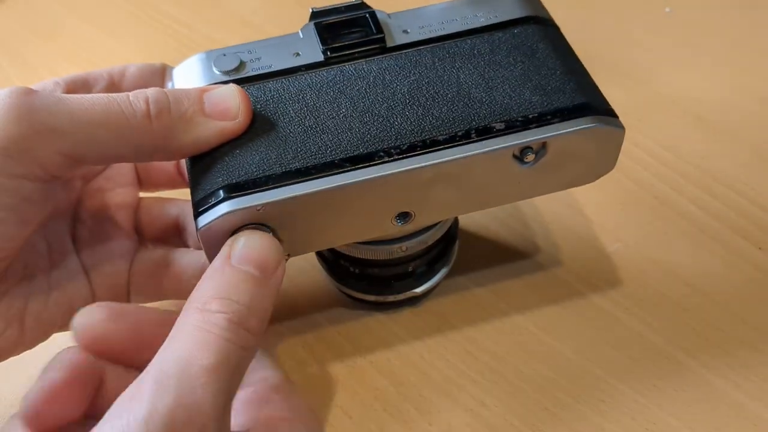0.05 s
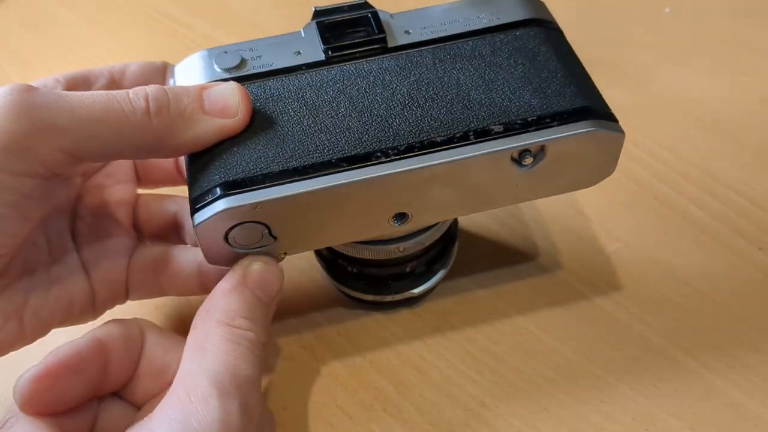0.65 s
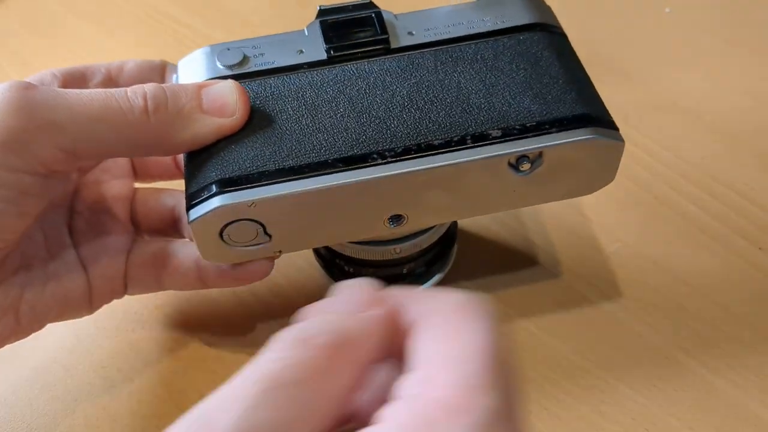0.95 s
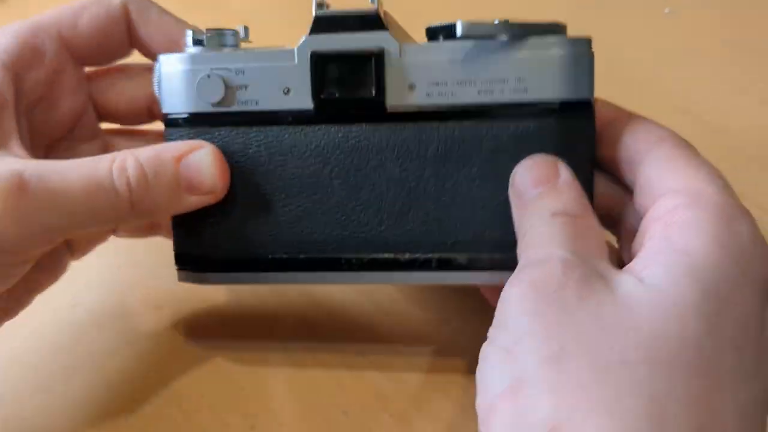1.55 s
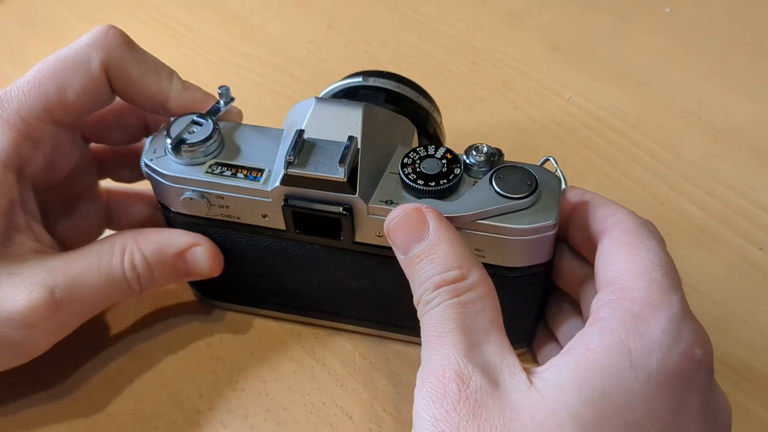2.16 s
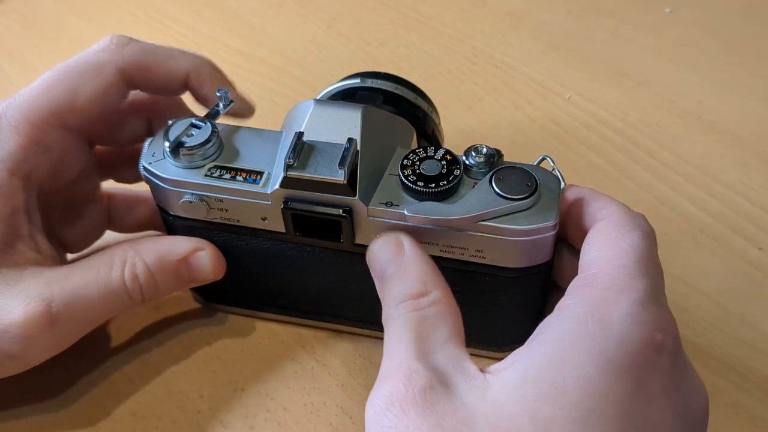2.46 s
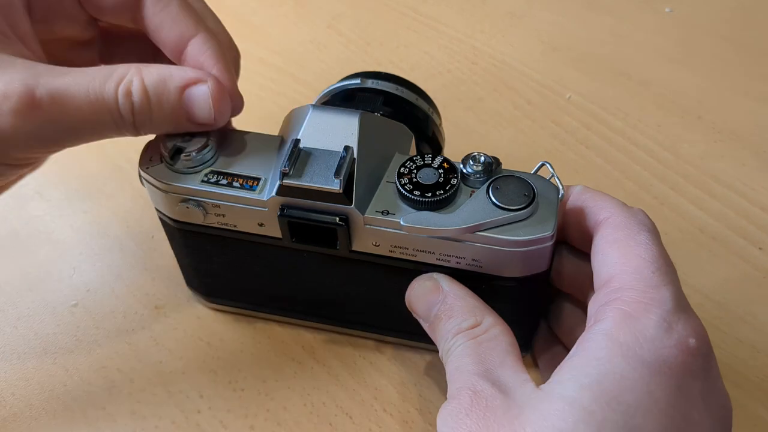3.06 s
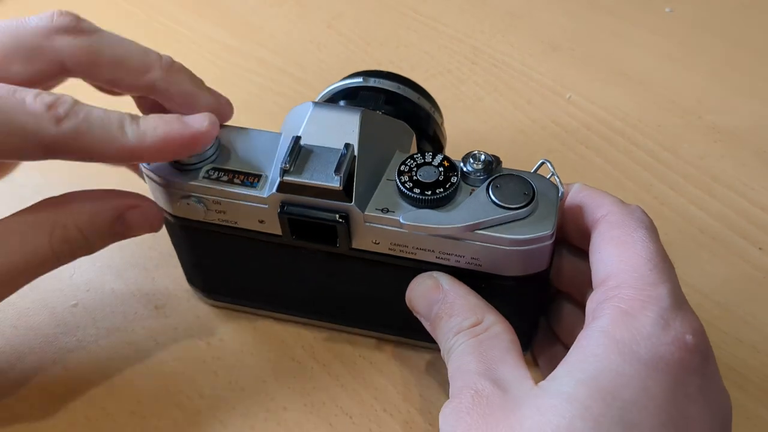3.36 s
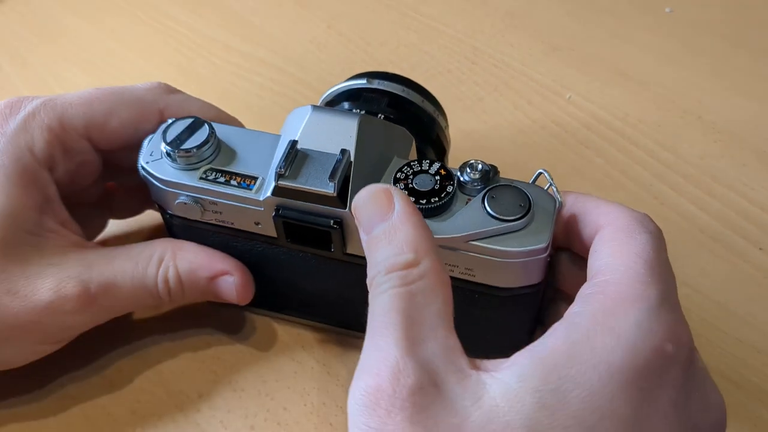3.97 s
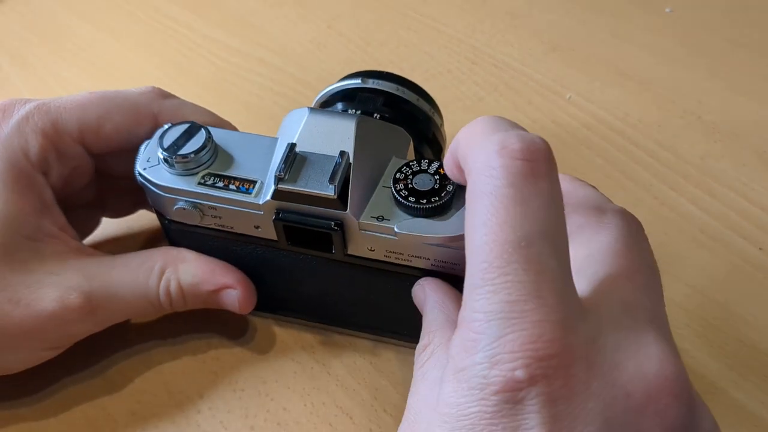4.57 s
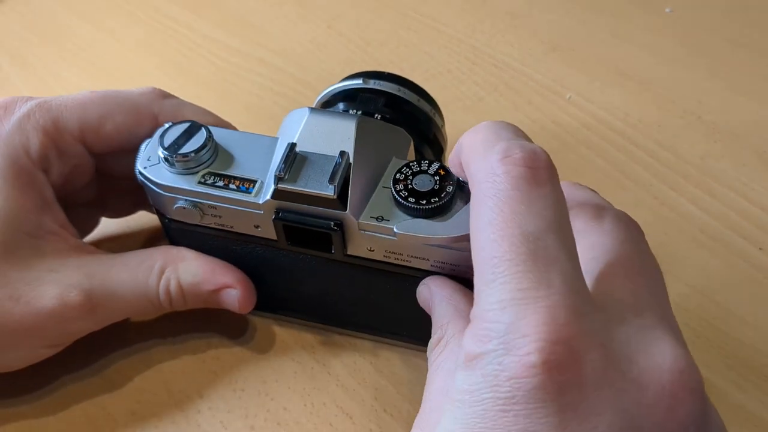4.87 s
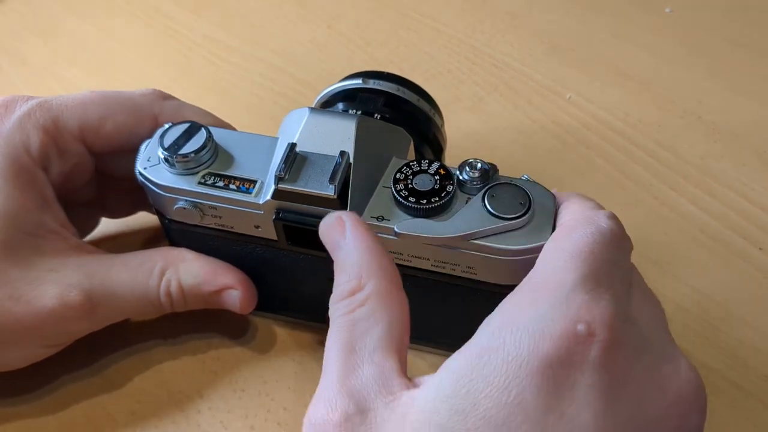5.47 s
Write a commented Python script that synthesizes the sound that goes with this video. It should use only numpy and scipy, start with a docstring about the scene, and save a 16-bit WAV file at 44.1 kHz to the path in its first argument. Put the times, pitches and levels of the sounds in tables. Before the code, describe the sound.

In a small, echoing room, a button on a metal film camera snaps out sharply. The lens rim skids briefly on a wooden table and the body is set down with several hollow knocks. Fingers slide faintly and fittings tick. The rewind crank folds shut with a bright click, and near the end the shutter fires with a quick whirr and clack. The sound is close, over a faint fan-like hum.

```python
"""A metal film camera is handled on a wooden table, then its shutter fires: the release snaps, gears whirr,
the curtains chatter against their stop and the mirror bounces. Before that a base button snaps, the lens
rim skids in stick-slip, the body is set down, ringing table and barrel, and the rewind crank folds shut.
Fittings tick and fingers slide in between. A faint fan-like hum fills the small, echoing room."""
import sys
import numpy as np
from scipy import signal
from scipy.fft import rfft, irfft, next_fast_len
from scipy.io import wavfile
from scipy.ndimage import uniform_filter1d

SR = 44100
rng = np.random.default_rng(int(sys.argv[2]) if len(sys.argv) > 2 else 0)


def output_pcm(signal):
    """Save a mono or channel-first signal as 16-bit PCM at the path in sys.argv[1].

    Samples are clipped to [-1, 1] before scaling.
    """
    pcm = np.clip(np.atleast_2d(signal).T, -1, 1) * 32767
    wavfile.write(sys.argv[1], SR, np.round(pcm).astype(np.int16))


N = 243431


def amp(db):
    """dB to gain."""
    return 10 ** (np.asarray(db) / 20)


def unit(x):
    """x at rms 1."""
    return x / np.sqrt(np.mean(x ** 2) + 1e-20)


def unit_hit(x):
    """x at the energy of 3 ms at rms 1, per channel."""
    return x / np.sqrt(np.sum(x ** 2, axis=-1, keepdims=True) / (.003 * SR) + 1e-20)


def along(points, hz):
    """(f/Hz, value) points read on a log axis."""
    f, v = np.transpose(points)
    return np.interp(np.log(hz + 1), np.log(f + 1), v)


def clock(size):
    """Sample times in s."""
    return np.arange(size) / SR


def swell(start_s, attack_s, hold_s, fall_db_per_s):
    """Envelope: rise, hold, decay."""
    t = clock(N) - start_s
    return np.clip(t / attack_s, 0, 1) ** 2 * amp(-fall_db_per_s * np.maximum(t - attack_s - hold_s, 0))


def add(track, s, x):
    """Mix x into track at time s."""
    part = track[:, round(s * SR):][:, :x.shape[-1]]
    part += x[..., :part.shape[1]]


def panned(x, left_db):
    """Left channel left_db above the right."""
    return x * amp([[left_db / 2], [-left_db / 2]])


def filtered(x, response):
    """x through a complex frequency response."""
    n = x.shape[-1]
    m = 2 * next_fast_len(n)
    return irfft(rfft(x, m) * response(np.fft.rfftfreq(m, 1 / SR)), m)[..., :n]


def coloured(x, tone):
    """Minimum-phase filter through (f/Hz, gain/dB) points."""
    def response(hz):
        cepstrum = irfft(np.log(amp(along(tone, hz))))
        cepstrum[1:len(hz) - 1] *= 2
        cepstrum[len(hz):] = 0
        return np.exp(rfft(cepstrum))
    return filtered(x, response)


def resonate(x, modes):
    """x through parallel (f/Hz, width/Hz, gain/dB) resonators."""
    def response(f):
        return sum(amp(db) * 1j * f * width / (hz * hz - f * f + 1j * f * width)
                   for hz, width, db in modes)
    return filtered(x, response)


def ringing(modes, rise_s, size=16384):
    """Damped (f/Hz, level/dB, t60/s) sines, random phases."""
    t = clock(size)
    hz, db, t60 = np.transpose(modes)[..., None]
    phase = rng.uniform(0, 2 * np.pi, hz.shape)
    partials = amp(db - 60 * t / t60) * np.sin(2 * np.pi * hz * t + phase)
    return partials.sum(axis=0) * (1 - np.exp(-t / rise_s))


# f/Hz, left-right correlation
CORRELATION = [(100, 0.85), (300, 0.92), (600, 0.36), (1200, -0.23), (2500, -0.1), (8000, -0.1)]


def noise(size):
    """Stereo white noise: alike in the bass, nearly unrelated in the treble."""
    def mid_side_gains(hz):
        angle = np.arccos(np.clip(along(CORRELATION, hz), -1, 1)) / 2
        return np.array([np.cos(angle), np.sin(angle)])
    mid, side = filtered(rng.standard_normal((2, size)), mid_side_gains)
    return np.array([mid + side, mid - side])


def snap(tone, t60_s, rise_s, size=4096):
    """Brief chatter of metal parts: a coloured noise burst."""
    t = clock(size)
    burst = noise(size) * amp(-60 * t / t60_s) * (1 - np.exp(-t / rise_s)) ** 2
    return unit_hit(coloured(burst, tone))


# Air spectrum: f/Hz, level/dB
AIR_TONE = [(15, -49), (25, -16.5), (43, -3), (114, -8), (145, 0), (170, -6.5), (200, 1), (363, -8),
            (416, -7.5), (695, -12), (911, -21), (1940, -14), (2350, -22.5), (4140, -28.5), (16000, -80.5)]
# Fan resonances: f/Hz, width/Hz, level/dB
FAN_MODES = [(197.1, 11, -3.5), (280.3, 5.4, -1.5), (424.9, 7, -3), (520.5, 40, -8), (1957.5, 62, -9.5)]


def background():
    """Steady room air and the resonant hum of a fan."""
    air = amp(-59.5) * unit(coloured(noise(N), AIR_TONE))
    fan = amp(-61.5) * unit(resonate(noise(N), FAN_MODES))
    return air + fan


# Room decay: f/Hz, t60/s
ECHO_DECAY = [(100, 1.17), (260, 0.35), (700, 0.65), (1840, 0.93), (3000, 0.41), (4850, 0.42),
              (12800, 0.14)]
# Echo spectrum: f/Hz, level/dB
ECHO_TONE = [(80, -1.5), (300, 0), (800, -7.5), (2800, -5.5), (6000, -10.5), (14000, -6.5)]


def room(x):
    """Diffuse stereo echo of the left channel; treble dies first."""
    hz, t, spectrum = signal.stft(noise(size=32768), SR, nperseg=256)
    t60 = along(ECHO_DECAY, hz)[:, None]
    fade = amp(along(ECHO_TONE, hz)[:, None] - 60 * t / t60)
    fade *= np.sqrt(2 * np.log(1000) / (t60 * SR))  # energy independent of t60
    tail = signal.istft(spectrum * fade, SR, nperseg=256)[1]
    tail *= np.clip(clock(tail.shape[1]) / .0058, 0, 1) ** 2  # walls answer late
    return signal.fftconvolve(x[:1], tail, axes=1)[:, :N]


# Shading of the right side: f/Hz, left over right/dB
LEFT_EXCESS = [(700, 0), (1800, 1.5), (4500, 5), (8000, 9), (13000, 4.5)]


def direct_path(x, right_lag_s=.00013):
    """The camera's sound reaches the left sooner and brighter."""
    side = np.array([[.5], [-.5]])
    def response(hz):
        return amp(side * along(LEFT_EXCESS, hz)) * np.exp(2j * np.pi * hz * side * right_lag_s)
    return filtered(x, response)


def shudder():
    """The shifting body judders at the table's lowest resonance."""
    envelope = swell(start_s=2.945, attack_s=.027, hold_s=.014, fall_db_per_s=110)
    return amp(-51) * envelope * unit(np.sin(2 * np.pi * 75 * clock(N)))


# Rub spectrum: f/Hz, level/dB
RUB_TONE = [(60, -11), (150, 2.5), (280, -0.5), (480, 0.5), (700, -5.5), (1000, -12.5), (1700, -11),
            (3000, -40), (8000, -51)]


def drag():
    """The body shifts on the table: a short, cushioned rub."""
    envelope = swell(start_s=.431, attack_s=.0089, hold_s=.014, fall_db_per_s=300)
    return amp(-46) * envelope * unit(coloured(noise(N), RUB_TONE))


# Fitting and case spectra: f/Hz, level/dB
FITTING_TONE = [(2000, -39.5), (5000, -14), (6500, -2.5), (8000, -11), (10000, 0), (12400, 1.5),
                (14000, -9), (16000, -1)]
CASE_KNOCK_TONE = [(400, -14), (1100, 0.5), (2800, -4.5), (3500, -4.5), (4400, -4.5), (5200, -14.5),
                   (6400, -6.5), (9000, -22), (16000, -30.5)]


def tick(case_db):
    """A fitting's bright tick and its knock through the case."""
    fitting = snap(FITTING_TONE, t60_s=.017, rise_s=.00037)
    return fitting + amp(case_db) * snap(CASE_KNOCK_TONE, t60_s=.017, rise_s=.0005)


# Finger slides: centre t/s, half length/s, level/dB
FINGER_SLIDES = [(0.722, 0.033, -67.5), (1.621, 0.011, -64), (2.682, 0.015, -57.5), (2.792, 0.013, -65),
                 (3.395, .008, -67), (3.57, 0.016, -60.5), (3.757, 0.012, -67), (3.983, 0.016, -74),
                 (4.311, 0.019, -73.5), (5.109, 0.0047, -60), (5.268, 0.024, -62)]


def fingers(snags_per_s=70, snag_db=6):
    """Skin slides over the fittings: grainy hiss, random snags."""
    pressure = sum(amp(db) * np.exp(-((clock(N) - s) / half_s) ** 2) for s, half_s, db in FINGER_SLIDES)
    grain = amp(3.5 * unit(uniform_filter1d(rng.standard_normal(N), size=90)))
    hiss = pressure * unit(coloured(noise(N) * grain, FITTING_TONE))
    snags = pressure * (rng.random(N) < snags_per_s / SR)
    return hiss + amp(snag_db) * signal.fftconvolve(snags[None], tick(case_db=-10.5), axes=1)[:, :N]


# Ticks: t/s, level/dB, case re tick/dB
FITTING_TICKS = [(1.5767, -60.5, 8.5), (1.6404, -46.5, 1), (2.6009, -60, 4.5), (2.681, -44.5, -25),
                 (2.698, -46.5, -26), (2.815, -55, -27), (3.4074, -56.5, -8), (3.5604, -45, -16),
                 (3.6802, -46.5, -13), (3.6894, -38, -18), (3.721, -44.5, -22), (3.8362, -61, 0),
                 (4.008, -59, -0.5), (4.533, -68, 4), (4.6291, -55.5, 7), (5.1155, -45, 0),
                 (5.2573, -51, -16), (5.4493, -59, -10)]


def fittings():
    """Strap rings, dials and levers tick as the hands move."""
    out = np.zeros((2, N))
    for s, db, case_db in FITTING_TICKS:
        add(out, s, amp(db) * tick(case_db))
    return out


# Wood thud spectrum: f/Hz, level/dB
THUD_TONE = [(30, -39.5), (70, -4.5), (140, -4.5), (300, -5.5), (480, -2.5), (900, -7), (1500, -8),
             (3000, -8.5), (8000, -25)]
# Table top and hollow lens barrel: f/Hz, width/Hz, level/dB
TABLE_MODES = [(74.5, 4.6, -4), (160, 32, -2.5), (227.4, 25, -18), (286, 51, -1.5), (370, 30, -4),
               (400.5, 31, 3), (565, 27, 2), (650, 33, -12), (800, 11, -12.5), (1206, 13, 5),
               (1333, 40, -25.5)]
BARREL_MODES = [(776, 48, -0.5), (836, 16, 1), (968, 85, -7.5), (1210, 21, -19), (1384, 6.1, -4.5),
                (1784, 57, -7), (2070, 15, -2), (2430, 14, -5)]


def bump(contact_hz, barrel_db):
    """One push rings table and barrel; softer contacts are duller and move the table more."""
    u = 2 * np.pi * 2.23 * contact_hz * clock(size=16384)
    push = -u ** 2 * np.exp(-u)
    thud = amp(-9.5) * unit_hit(coloured(push, THUD_TONE))
    rocking = amp(-9.5) * unit_hit(resonate(push, [(contact_hz, contact_hz / 5, 0)]))
    table_db = -8 - 2.5 * np.log2(contact_hz / 200)
    table = amp(table_db) * unit_hit(resonate(push, TABLE_MODES))
    barrel = amp(barrel_db + 5.5) * unit_hit(resonate(np.diff(push, prepend=0), BARREL_MODES))
    return thud + rocking + table + barrel


# Skidding lens on the table: f/Hz, width/Hz, level/dB
SKID_MODES = [(157, 27, -4), (311, 89, -7), (580, 45, -2), (796, 130, -6), (1222, 16, -2.5), (1412, 11, -3),
              (1807, 28, -5.5), (2094, 7.2, -1.5), (2500, 52, -10), (3410, 42, -15), (3850, 84, -2),
              (4400, 140, -41), (6630, 99, -3), (7810, 35, -32)]
SKID_S, GRIP_S, PUSH_S = 1.3793, .016, .046  # start, then two durations
SLIP_HZ, SLIP_TOP_HZ, SLIP_OCTAVES_PER_S = 230, 2200, 47


def skid(growth_db_per_s=170):
    """The rim sticks and slips on the wood; quicker slips reach higher resonances."""
    gripped_s = SKID_S + GRIP_S
    def cutoff_hz(s):
        octaves = np.clip(SLIP_OCTAVES_PER_S * (s - gripped_s), 0, np.log2(SLIP_TOP_HZ / SLIP_HZ))
        return SLIP_HZ * 2 ** octaves
    force = amp(-24.5 + growth_db_per_s * np.minimum(clock(N) - gripped_s - PUSH_S, 0))
    force *= swell(SKID_S, GRIP_S, PUSH_S, fall_db_per_s=275)
    hz, t, spectrum = signal.stft(noise(N), SR, nperseg=256)
    spectrum /= np.sqrt(1 + (hz[:, None] / cutoff_hz(t)) ** 3)
    slips = signal.istft(spectrum, SR, nperseg=256)[1][:, :N]
    slips *= force / np.sqrt(cutoff_hz(clock(N)) / (SR / 2))  # power independent of cutoff
    bass_cut = signal.butter(2, 100, "highpass", fs=SR, output="sos")  # too small to radiate bass
    slips = signal.sosfilt(bass_cut, slips)
    return amp(-11.5) * slips + amp(5) * resonate(slips, SKID_MODES)


# Lens rim: f/Hz, level/dB, t60/s
RIM_MODES = [(3720, -2.5, 0.21), (3970, -7, 0.21), (6600, -14, 0.17), (6870, -13, 0.17), (12400, 1, 0.079)]
# Catches on the wood: t/s, level/dB
RIM_CATCHES = [(1.433, -42.5), (1.4408, -42), (1.4549, -36)]


def rim():
    """The body tips onto the lens; the thin rim ticks and sings where it catches."""
    out = np.zeros((2, N))
    add(out, SKID_S - .022, amp(-41.5) * bump(contact_hz=129, barrel_db=-26.5))
    for s, db in RIM_CATCHES:
        add(out, s, amp(db) * tick(case_db=1.5))
        ring = np.array([ringing(RIM_MODES, rise_s=.00071), ringing(RIM_MODES, rise_s=.0014)])
        add(out, s, amp(db - 7) * ring)
    return out


# Body on table: t/s, level/dB, contact f/Hz, relative barrel level/dB, relative rattle level/dB
BODY_KNOCKS = [(1.633, -34, 400, -8.5, -17.5), (1.712, -19, 254, -11, -30),
               (1.8372, -16.5, 334, -32.5, -25.5), (2.128, -27, 355, -15.5, -33.5),
               (2.179, -33, 302, -28, -28), (3.193, -40, 173, -24, -39), (3.7947, -31, 319, -31, -41),
               (4.478, -49.5, 130, -26.5, -15)]
# Loose parts: f/Hz, level/dB
LOOSE_TONE = [(400, -17), (1200, -0.5), (3300, -4.5), (5000, -15.5), (16000, -35)]


def knocks(reflection_s=.0152, reflection_db=-4.5, reflection_pitch=.666):
    """The body knocks, its case clicks, parts rattle; a softer, duller early room reflection follows."""
    out = np.zeros((2, N))
    for s, db, contact_hz, barrel_db, rattle_db in BODY_KNOCKS:
        add(out, s, amp(db) * bump(contact_hz, barrel_db))
        add(out, s, amp(db + rattle_db) * tick(case_db=3))
        add(out, s, amp(db + rattle_db + 4) * snap(LOOSE_TONE, t60_s=.13, rise_s=.002))
        reflection = bump(reflection_pitch * contact_hz, barrel_db - 7.5)
        add(out, s + reflection_s, amp(db + reflection_db) * reflection)
    return out


# Button snaps: t/s, level/dB
BUTTON_SNAPS = [(0.2116, -15.5)]
# Snap spectrum: f/Hz, level/dB
BUTTON_SNAP_TONE = [(300, -38.5), (1600, -25.5), (2150, -6.5), (3300, -15), (4200, -4), (5200, -15),
                    (6200, 0.5), (7500, -11.5), (8400, -7), (9200, -1.5), (10000, -5), (10800, 4.5),
                    (12200, -6.5), (13500, -7), (16000, -11.5)]
# Base plate: f/Hz, level/dB, t60/s
PLATE_MODES = [(2580, -2.5, .025), (2764, -1.5, .025), (2930, 0, 0.045), (3010, -10, 0.032),
               (3250, -11, .025)]


def button():
    """The base button springs out; the plate rings, mostly on the right."""
    out = np.zeros((2, N))
    for s, db in BUTTON_SNAPS:
        ring = unit_hit(ringing(PLATE_MODES, rise_s=.0011))
        ping = unit_hit(ringing([(2730, 0, .0034)], rise_s=.00046))
        plate = amp(db - 12) * ring + amp(db - 14) * ping
        add(out, s, amp(db - 9) * snap(BUTTON_SNAP_TONE, t60_s=.013, rise_s=.0003))
        add(out, s + .0012, panned(plate, left_db=-6.5))
    return out


# Crank folds: t/s, level/dB
CRANK_FOLDS = [(3.264, -17.5)]
# Fold spectrum: f/Hz, level/dB
FOLD_TONE = [(400, -18), (2000, -13), (3200, -22.5), (5200, -17.5), (6300, 3.5), (7400, -14.5), (8400, -11),
             (9400, -1.5), (11000, -11), (11900, 2), (13500, -4.5), (16000, -3)]


def crank():
    """The rewind crank snaps into its knob, rebounds once and nudges the body."""
    out = np.zeros((2, N))
    for s, db in CRANK_FOLDS:
        add(out, s, amp(db - 6) * snap(FOLD_TONE, t60_s=.0096, rise_s=.00058))
        add(out, s + .0048, amp(db - 13) * snap(FOLD_TONE, t60_s=.018, rise_s=.00047))
        add(out, s, amp(db - 21.5) * bump(contact_hz=197, barrel_db=-22))
    return out


# Gear train: f/Hz, level/dB
WHIRR_TONE = [(60, -31.5), (140, -8), (400, 1.5), (660, -13), (950, 5.5), (1300, -16), (2100, -11),
              (2800, -5), (3500, -9), (4100, -2.5), (5200, -11.5), (6500, -4.5), (7900, -15), (11000, -7.5),
              (15500, -16)]
RELEASE_S, CURTAIN_START_S, CURTAIN_STOP_S = 4.8419, .033, .078  # curtain times after release


def gears():
    """Gears idle from the release, spin up with the curtains, then run out."""
    idle = amp(-42) * swell(RELEASE_S, attack_s=.014, hold_s=CURTAIN_STOP_S, fall_db_per_s=400.5)
    run = amp(-33.5) * swell(RELEASE_S + CURTAIN_START_S, attack_s=.017, hold_s=.022, fall_db_per_s=1201.5)
    teeth = amp(2.3 * unit(uniform_filter1d(rng.standard_normal(N), size=50)))
    return np.hypot(idle, run) * unit(coloured(noise(N) * teeth, WHIRR_TONE))


# Shutter impacts: f/Hz, level/dB
CLACK_TONE = [(300, -21), (650, -12.5), (1000, -11), (1700, -6.5), (2300, -10), (2850, -10), (3450, -12.5),
              (4400, -7), (5200, -15), (6500, -7.5), (7900, -13.5), (9500, -5.5), (12500, -9.5),
              (15500, -12)]
RELEASE_DB, CURTAIN_DB, STOP_DB = -24, -38.5, -27.5
CHATTER_S, CHATTER_GROWTH_DB = .0023, 1.5
BOUNCE_S, BOUNCE_LOSS_DB = .02, 8


def shutter(chatters=4, bounces=2):
    """The release trips, curtains run and chatter on their stop, the mirror bounces, the body recoils."""
    out = gears()
    stop_s = RELEASE_S + CURTAIN_STOP_S
    add(out, RELEASE_S, amp(RELEASE_DB) * snap(CLACK_TONE, t60_s=.019, rise_s=.0006))
    curtain = [(RELEASE_S + CURTAIN_START_S, CURTAIN_DB)]
    chatter = [(stop_s + k * CHATTER_S, STOP_DB + k * CHATTER_GROWTH_DB) for k in range(chatters)]
    mirror = [(stop_s + k * BOUNCE_S, STOP_DB - k * BOUNCE_LOSS_DB) for k in range(1, bounces + 1)]
    for s, db in curtain + chatter + mirror:
        add(out, s, amp(db) * snap(CLACK_TONE, t60_s=.028, rise_s=.00033))
    recoil = bump(contact_hz=150, barrel_db=-23.5)
    add(out, RELEASE_S + .00324, amp(-35.5) * recoil)
    add(out, stop_s + .006, amp(-35) * bump(contact_hz=380, barrel_db=-13.5))
    add(out, stop_s + .064, amp(-37.5) * recoil)  # body settles
    return out


def scene():
    """Camera sounds, direct and echoed, over the background."""
    # signal, echo send/dB
    sources = [(button(), 2.5), (crank(), -1), (fittings(), -1), (shutter(), 1), (knocks(), .5),
               (skid() + rim(), -11.5), (fingers() + drag(), -3.5)]
    direct = direct_path(sum(x for x, _ in sources))
    echo = sum(amp(send_db) * room(x) for x, send_db in sources)
    return direct + panned(echo, left_db=1) + shudder() + background()


def record(dry, low_hz=40, top_hz=15950):
    """Bass cut and steep upper band limit."""
    lean = signal.sosfilt(signal.butter(4, low_hz, "highpass", fs=SR, output="sos"), dry)
    return filtered(lean, lambda hz: 1 / np.sqrt(1 + (hz / top_hz) ** 240))


dry = scene()
out = record(dry)
output_pcm(out)
```